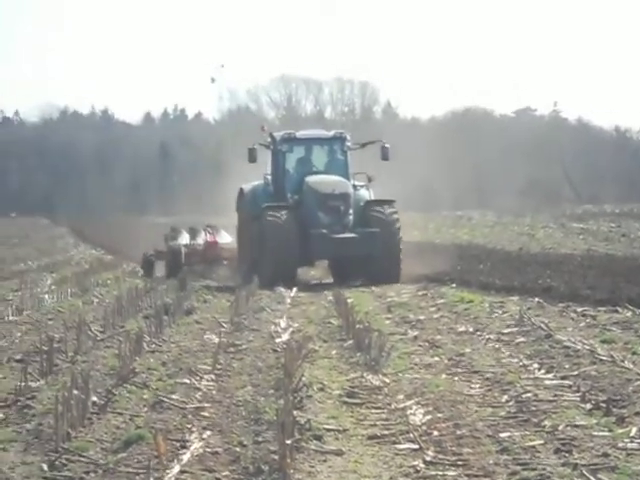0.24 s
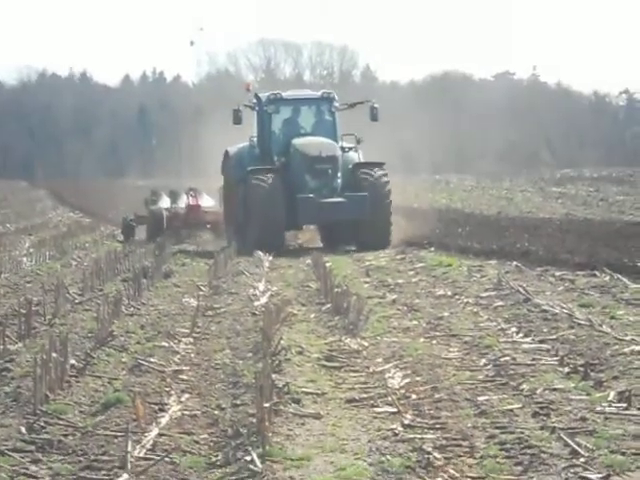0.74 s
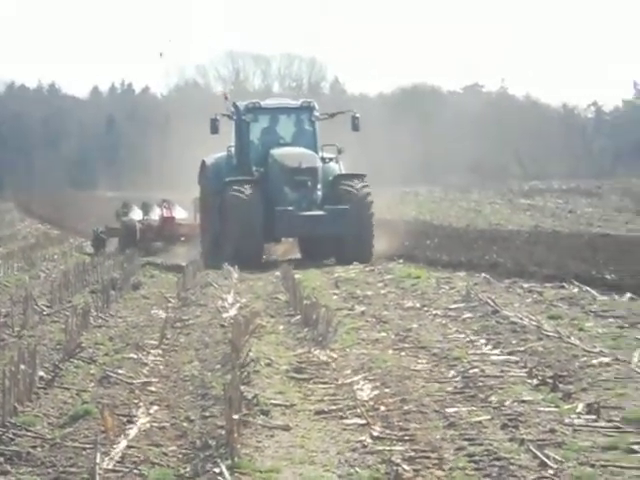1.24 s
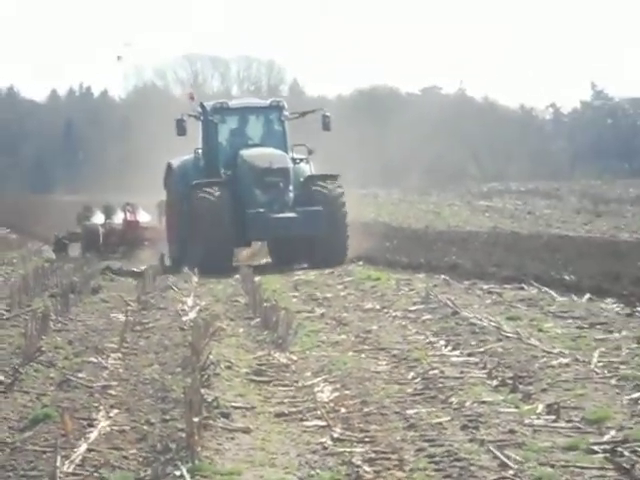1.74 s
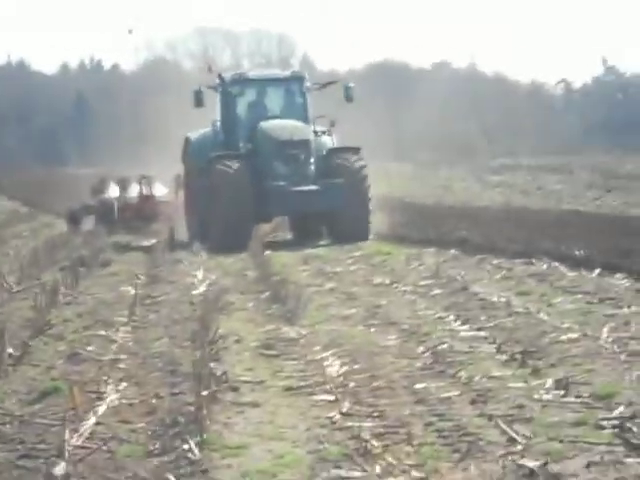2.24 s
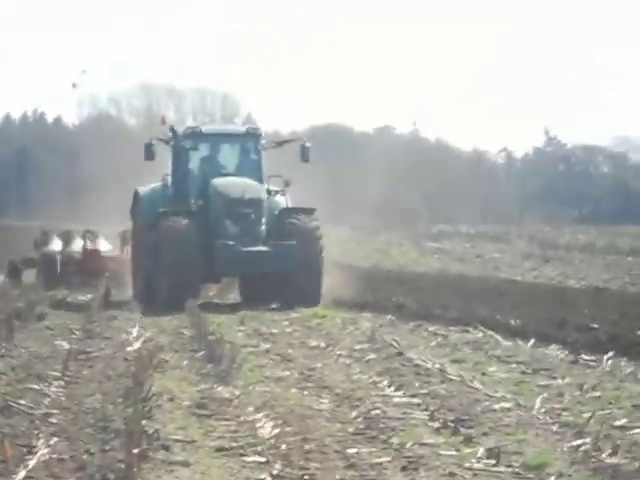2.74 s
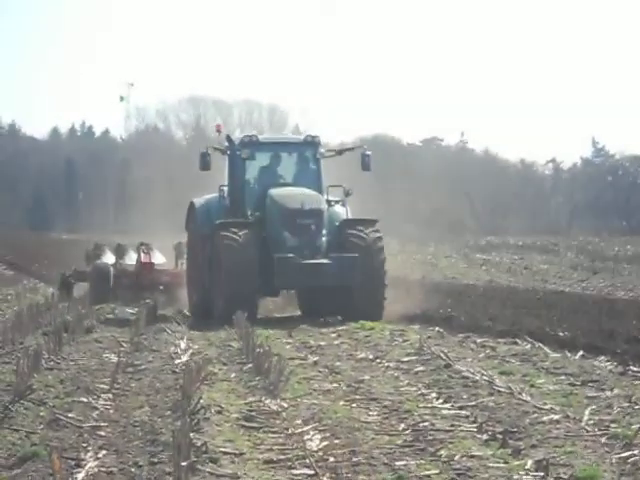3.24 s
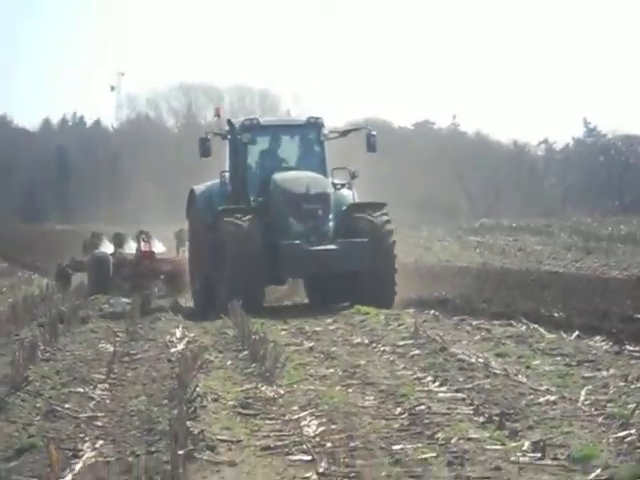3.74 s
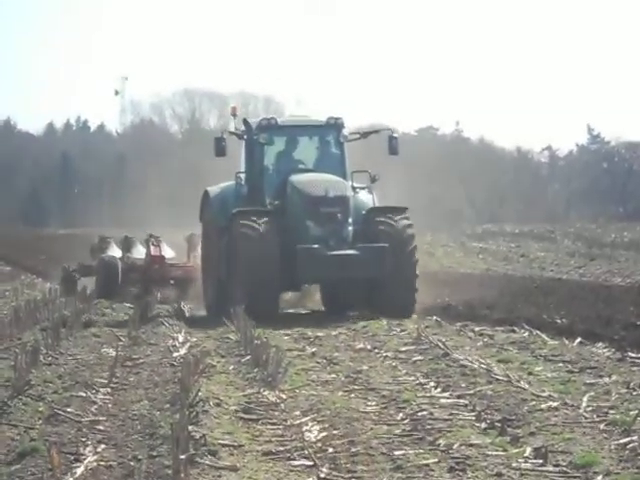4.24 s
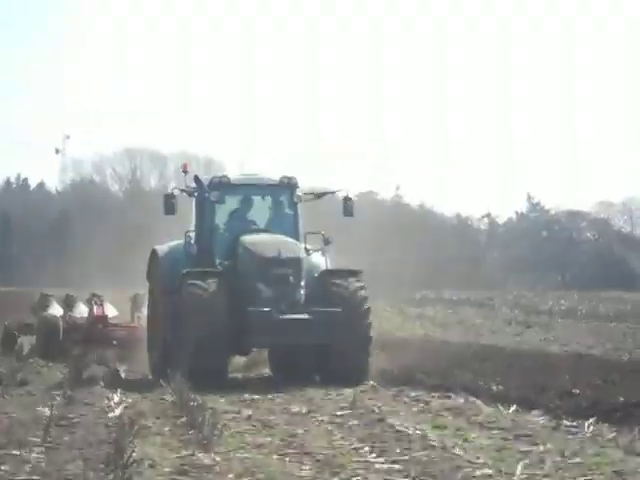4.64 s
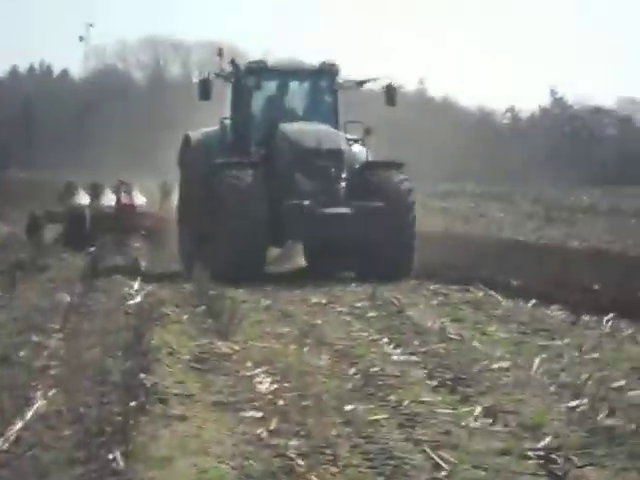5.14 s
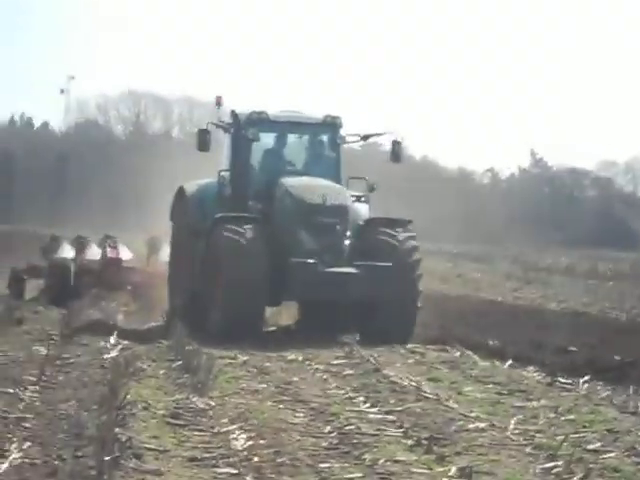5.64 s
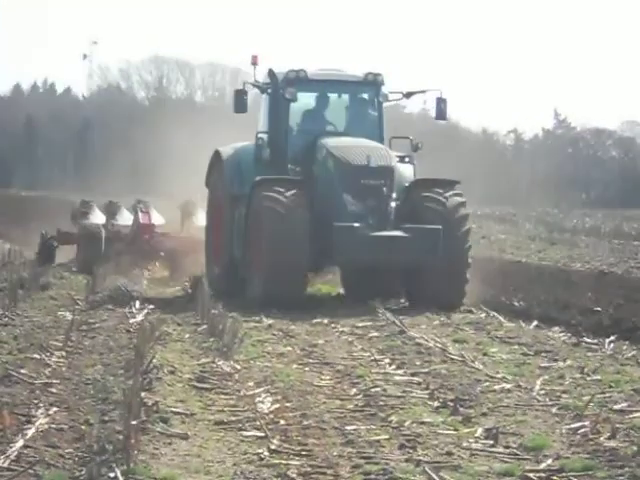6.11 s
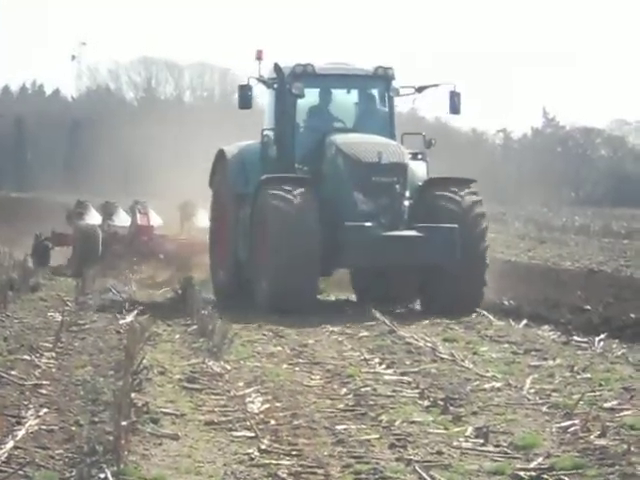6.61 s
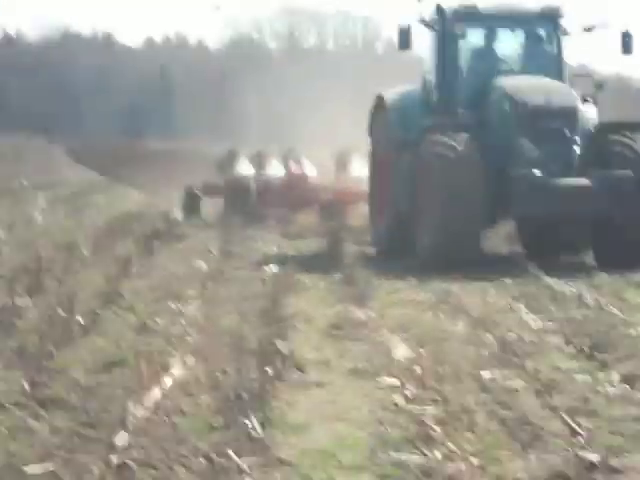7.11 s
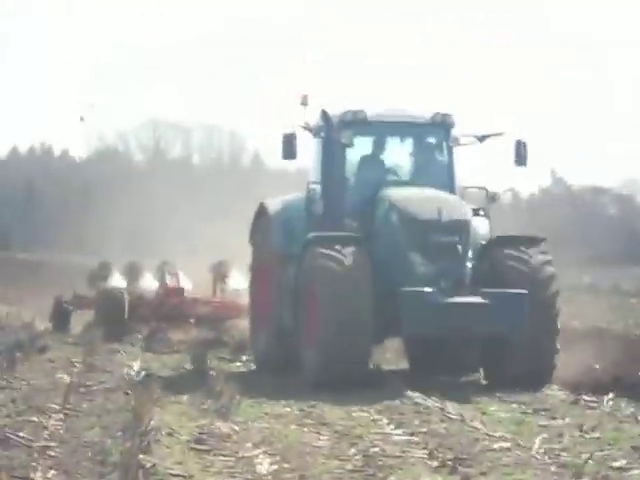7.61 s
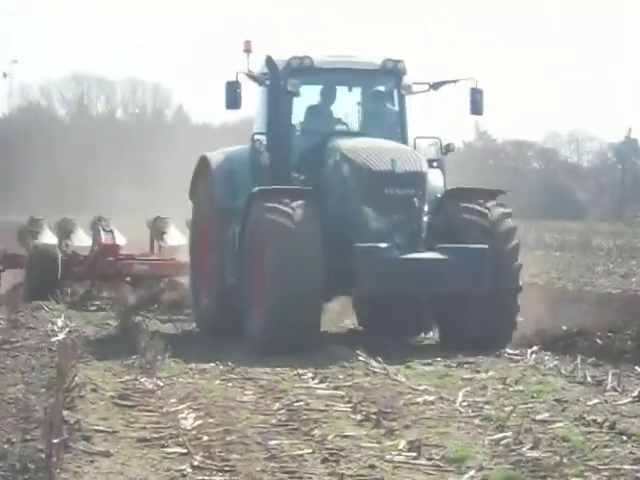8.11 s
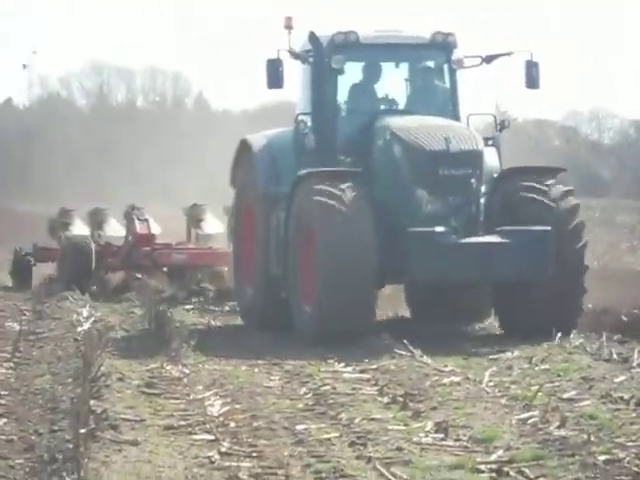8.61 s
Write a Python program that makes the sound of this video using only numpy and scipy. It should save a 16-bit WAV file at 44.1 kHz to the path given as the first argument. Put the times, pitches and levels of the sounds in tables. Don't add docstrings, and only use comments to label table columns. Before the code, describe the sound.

A heavy diesel tractor drones steadily as it ploughs across stubble toward the microphone, with wind gusts thumping and dry stalks snapping up close.

```python
import sys
import numpy as np
from scipy import signal
from scipy.fft import rfft, irfft, next_fast_len
from scipy.io import wavfile
from scipy.ndimage import uniform_filter1d

SR = 44100
rng = np.random.default_rng(int(sys.argv[2]) if len(sys.argv) > 2 else 0)


def boost_factor(decibels):
    exponent = np.asarray(decibels, float) / 20
    return 10 ** exponent


def int16_out(signal):
    q = np.round(np.clip(np.atleast_2d(signal).T, -1, 1) * 32767)
    wavfile.write(sys.argv[1], SR, q.astype(np.int16))


N = 390726

# t/s, firing rate f/Hz
FIRING_HZ = [(0, 82.1), (.35, 82.2), (.52, 81.4), (.85, 81.8), (1.2, 81.1), (1.48, 82.1), (1.7, 81.5),
             (3.25, 81.05), (3.65, 81.75), (3.85, 81.25), (4.25, 82.25), (5.2, 81.95), (5.4, 81.35),
             (5.75, 82.4), (6.05, 81.5), (7.9, 82.3), (8.35, 81.3), (8.86, 81.15)]
# t/s, distance/1 (2 far, 0 close)
DISTANCE = [
    (0, 1.75),
    (1.4, 1.77),
    (2.6, 0.74),
    (3.3, 1.17),
    (4.2, 0.57),
    (5.3, 0.65),
    (6.3, 0.38),
    (7, 0.033),
    (8.86, 0.057),
]
# t/s, level re roar/dB
BOOM_DB = [(0, 12.5), (1.0, 9.5), (1.2, 10.5), (1.7, 12.5), (2.3, 8), (2.6, 11.5), (3.2, 13.5), (3.8, 12.5),
           (4.3, 11.5), (6.0, 12), (6.9, 10.5), (7.7, 9.3), (8.86, 11)]
# order/(1/cycle), level re roar/dB
ORDERS_DB = [(3, -10), (11, -12), (12, -8), (14, -7.5), (15, -8), (18, -13.5), (19, -21), (20, -9),
             (22, -12), (24, -12), (26, -17), (28, -17.5), (30, -21.5), (36, -22.5), (38, -28), (53, -16.5),
             (90, -13.5), (94, -18), (96, -19.5)]
# order/(1/cycle), level re roar/dB
TIMING_DB = [(102, -11), (120, -21)]
# order/(1/cycle), level/dB
PUMPS_DB = [(31.1, -2.5), (33.07, -1.5), (42.4, -8)]
# f/Hz, density re roar/(dB per Hz)
ROAR_SPECTRUM_DB = [(26, -44), (72, -26), (145, -31), (180, -23.5), (339, -29.5), (430, -31), (476, -33.5),
                    (546, -27.5), (737, -28), (899, -34), (1162, -29.0), (1259, -25), (1396, -31), (1499, -33.5),
                    (1550, -39.5), (1722, -41), (1981, -35.5), (2583, -34), (2928, -38.5), (3445, -37),
                (3703, -38.5), (4220, -39.5), (4737, -35.7), (5857, -40.5), (6201, -40), (8871, -47),
                (9733, -48), (9991, -48.5)]
# f/Hz, level/dB
MIDWAY_DB = [(516, -0.9), (1550, 0), (1950, 0), (2550, 0.5), (2950, -1), (3359, -3.5), (4048, 1.5),
             (4478, -2), (4909, -0.5), (5770, -3.5), (6459, -1), (7062, -3), (9991, -2.5)]
# f/Hz, level/dB
FAR_DB = [(516, 1.9), (1464, 2), (1894, 5.5), (2497, -8.5), (2680, -3), (2900, -5), (3150, 4), (3445, -3),
          (3750, 2), (3962, 4.5), (6115, -4), (7751, 1.8), (9646, -4.5), (9991, -3.5)]
# t/s, level/dB, half width/s
GEAR_SLACK = [
    (2.5, -10, 0.34),
    (.15, 2.5, .2),
    (3.35, -7, 0.6),
    (8.86, -10, 0.53),
]
# t/s, roar level/dB, treble level/dB, half width/s
BITES = [
    (1.0, 2.5, -1, 0.064),
    (1.42, -1.5, 3.5, .04),
    (3.0, 1.5, -2.5, .6),
    (6.7, 0.2, 0.8, .2),
    (8.35, -0.6, -1.1, .25),
]
# t/s, f/Hz
TURBO_HZ = [(0, 4015), (.5, 3972), (1.1, 3957), (2.2, 3962), (3.5, 3990), (4.1, 3990), (4.6, 3965),
            (8.86, 3960)]
# t/s, level re roar/dB
TURBO_BEAM_DB = [(0, -20), (.2, -11), (.42, -11), (.5, -17), (.6, -10), (1.05, -12), (1.15, -16),
                 (1.38, -10), (1.5, -20), (2.3, -21), (3.5, -21), (4.0, -17), (4.6, -27), (5.2, -31)]
# t/s, peak level/dB, hold/s
RUMBLES = [(0, -23, .02), (.16, -22, .03), (.28, -20, .02), (.41, -27, .01), (.49, -17, .02),
           (.84, -23.5, 0.048), (1.065, -19, .035), (1.31, -28, .02), (1.44, -29, .01), (1.54, -30, .01),
           (1.76, -21, 0.055), (1.91, -30, .01), (2.08, -36, .03), (2.3, -39, .03), (2.56, -33, .02),
           (2.77, -37, .05), (3.03, -37, .01), (3.31, -31, .01), (3.44, -29, .02), (3.55, -28, .05),
           (3.78, -25, .07), (4.01, -26, .03), (4.13, -24, .02), (4.3, -21.5, .13), (4.58, -27, .06),
           (4.74, -28, .02), (5.01, -28, .05), (5.2, -26, .1), (5.45, -26, .06), (5.67, -26, .02)]
# t/s, peak level/dB, hold/s
FLUTTERS = [(.16, -19, .04), (.28, -21, .03), (.44, -22, .01), (.84, -24, .011), (1.05, -20.5, .03),
            (1.31, -23, .03), (1.43, -21, .01), (1.51, -22, .01), (1.74, -24, 0.1), (1.92, -27, .065),
            (2.03, -29, .04), (2.2, -27, .06), (2.75, -24, 0.0093), (2.9, -25, 0.072),
            (3.07, -22.5, 0.0093), (3.25, -22.5, .11), (3.36, -20.5, .046), (3.48, -20, .03),
            (3.6, -23.5, .05), (3.81, -20, 0.061), (4.0, -21, 0.07), (4.06, -17, .02), (4.16, -19, .01),
            (4.25, -20, .03), (4.36, -21, 0.033), (4.48, -19, 0.011), (4.62, -18, .01), (5.01, -22, 0.057),
            (5.3, -21, 0.092), (5.46, -21, .06), (5.95, -21, 0.044)]
# t/s, rumble level/dB, flutter level/dB
BREEZE_DB = [(0, -38, -28), (2.1, -39, -25.5), (3.2, -41, -25), (3.7, -34, -20), (6.1, -35, -26),
             (6.4, -42, -26.5), (8.86, -43, -27)]
# t/s, peak level/dB, f/Hz
PUSHES = [(0.4328, -8.2, 170), (1.379, -8.9, 220), (1.4083, -12.8, 170), (1.4433, -7.7, 190),
          (1.4494, -14.4, 150), (1.6938, -14.5, 170), (1.7056, -6.6, 220), (1.7163, -6.3, 190),
          (1.7185, -15.5, 440), (1.7221, -14.2, 440), (1.7243, -15.0, 100), (1.7489, -12.4, 140),
          (1.7567, -15.6, 130), (1.7649, -10.8, 220), (1.7714, -13.2, 200), (1.7765, -17.4, 220),
          (1.7841, -11.2, 440), (1.7903, -16.2, 530), (1.8001, -17.8, 100), (1.8028, -15.7, 270),
          (1.8101, -18.1, 250), (1.8161, -16.5, 530), (1.9222, -17.7, 140), (1.9287, -20.5, 170),
          (1.9657, -20.1, 170), (2.0617, -23.2, 150), (2.2246, -22.1, 250), (3.3478, -13.9, 220),
          (3.4057, -14.2, 270), (3.4723, -12.2, 170), (3.4795, -12.9, 220), (3.7894, -10.0, 200),
          (4.308, -8.5, 170), (4.3189, -13.3, 140), (4.365, -11.2, 250), (4.3717, -12.1, 250),
          (4.3815, -4.0, 190), (4.4455, -15.1, 220), (4.4737, -7.0, 270), (4.4782, -13.0, 150),
          (4.5016, -14.7, 170), (4.5112, -11.1, 200), (4.5295, -14.1, 190), (4.6133, -17.4, 140),
          (4.6376, -14.8, 360), (4.6451, -15.2, 300), (5.1478, -14.9, 250), (5.2127, -12.0, 270),
          (5.2893, -13.4, 220), (5.3854, -11.6, 200), (5.3941, -15.3, 250), (5.4369, -13.1, 360),
          (5.4795, -12.9, 200), (5.4941, -11.2, 150),
          (1.7185, -21, 600), (1.756, -21, 750), (1.8035, -17, 950), (2.088, -22, 420), (1.27, -19, 450),
          (4.062, -15, 270), (4.4935, -13, 130), (4.251, -13, 110), (5.343, -19, 700), (1.9, -25, 600),
          (4.4765, -21, 750), (4.506, -15, 400), (4.4925, -21, 700), (2.005, -22, 130), (2.027, -23, 200),
          (2.077, -22, 120), (1.898, -21, 130), (1.429, -15, 120), (1.343, -17, 150), (1.819, -16, 120),
          (5.315, -15, 130), (3.947, -16, 280), (3.995, -16, 280)]
# t/s, peak level/dB, f/Hz
PULLS = [(0.2748, -12.6, 190), (0.845, -12.7, 200), (1.062, -12.5, 250), (1.4331, -12.8, 190),
         (1.4438, -13.0, 360), (1.6602, -15.7, 200), (1.7239, -6.1, 300), (1.7725, -14.6, 580),
         (1.7774, -9.6, 110), (1.7839, -5.4, 170), (1.7858, -6.6, 780), (1.7868, -15.2, 710),
         (1.7887, -11.6, 400), (1.7943, -12.1, 1140), (1.7954, -12.6, 200), (1.8072, -11.7, 330),
         (1.8179, -12.5, 270), (1.824, -17.0, 110), (1.9369, -16.0, 200), (2.127, -16.6, 270),
         (2.2001, -21.5, 190), (3.4239, -14.5, 220), (3.5091, -12.2, 360), (4.0582, -10.6, 200),
         (4.2322, -13.0, 220), (4.2848, -12.5, 140), (4.3276, -11.2, 190), (4.3445, -10.1, 200),
         (4.3552, -9.9, 220), (4.3608, -4.6, 140), (4.3839, -12.3, 330), (4.3946, -11.9, 150),
         (4.4907, -13.3, 200), (4.5244, -11.1, 220), (4.5426, -14.4, 150), (4.5792, -13.3, 220),
         (4.6024, -13.9, 200), (4.6153, -12.3, 330), (5.3444, -9.2, 220), (5.4271, -14.5, 170),
         (5.4846, -15.2, 200),
         (4.525, -11, 100), (4.586, -16, 100), (4.61, -16, 100), (4.451, -16, 100), (1.807, -14, 100),
          (1.3, -17, 130), (1.275, -17, 130)]
# t/s, gain/dB, hold/s
DUCKS = [(1.09, -1, 0.36), (1.433, -6, 0.35), (1.775, -17.5, 0.5), (4.31, -2.5, .05), (4.375, -6, 0.26),
         (4.507, -7.5, 0.59), (5.28, -6, 0.18), (5.68, -4.2, .15), (5.957, -2.5, 0.13)]
# t/s, peak level/dB, centre f/Hz, bandwidth/octaves
SNAPS = [(1.41, -24, 3370, 0.11), (1.404, -29, 3100, 0.092), (1.408, -25, 6300, .12),
         (1.7315, -20, 3300, 2.1), (1.9133, -23, 4500, 2.5), (1.9134, -19, 1300, .8),
         (1.9143, -22, 1200, .4), (1.9142, -13, 3800, 4), (1.9143, -22, 9800, .5), (1.9237, -28, 9000, .7),
         (1.9325, -24, 5700, .2), (1.9326, -27, 8300, .12), (1.9329, -24, 3050, 0.3), (2.9, -23, 3640, 1.5),
         (4.4867, -16.5, 3240, 0.3), (4.4866, -19, 1780, 0.3), (4.4868, -15, 5950, .26),
         (4.487, -26, 8600, .3), (5.64, -18, 4200, .7), (7.0266, -16, 9500, .6), (7.0558, -10, 8600, 0.48),
         (7.0558, -11, 11800, .2), (7.056, -10, 5000, 0.5), (7.0566, -10, 3400, 0.4),
         (7.058, -15, 1700, 1.1), (7.256, -11, 5200, .6), (7.2564, -9, 3000, .8), (7.2577, -12, 2500, 1.2),
         (7.6636, -14, 8700, .81), (7.8857, -20, 3300, 1.7), (8.0927, -11, 9700, .6),
         (8.0945, -16, 9300, .6), (8.0961, -14, 11000, .5), (8.0987, -10, 12000, .3),
         (8.0989, -6, 9300, 0.35), (8.1005, -11, 8000, 1.1), (8.1215, -18, 9500, 0.96),
         (8.528, -22, 7500, .6), (8.5388, -16, 7500, .7), (8.5413, -19, 7600, .5), (8.5458, -21, 8300, .5),
         (8.5508, -19, 6900, .4), (8.568, -17, 8500, 1.2), (8.5805, -22, 5000, .7),
         (8.6221, -25, 5000, .15), (8.627, -26, 5000, .15), (8.632, -24, 5130, .15),
         (8.6533, -14, 7000, 1.7), (8.6625, -16, 6500, 1.7)]
# f/Hz, level/dB
MICROPHONE_DB = [(9800, 0.5), (10300, -0.5), (10700, -11), (11100, -19.5), (11600, -17), (12000, -23),
                 (12230, -33), (12400, -45)]

CYLINDERS = 6
GEAR_ORDER, GEAR_DB = 68.6, -9.5
PUMP_DB, PUMP_DB_PER_S = -7, -0.31
ROAR_DB, ROAR_RISE_DB_PER_S, ROAR_LEVELS_OFF_S = -30.5, .5, 6.56
DUCK_ATTACK_S, CREEP_PER_S, CREEP_BEND = 0.018, 0.45, 0.82
GUST_RISE_DB_PER_S, GUST_FALL_DB_PER_S = 170, 198
EDDY_CYCLES, EDDY_TRIM_DB = .55, -1.5
OVERLOAD_S, OVERLOAD_DB, OVERLOAD_WIDTH_S = 1.7811, 3.5, .0015
SNAP_T60_S, SNAP_NARROW = 0.0058, 0.33
CRACKLE_PER_S, CRACKLE_DB, CRACKLE_FROM_S = 30, -29.5, 6.2
CEILING = .708


def columns(rows):
    s, *rest = np.transpose(rows)
    return [np.interp(np.arange(N) / SR, s, c) for c in rest]


def at_hz(points, hz):
    table_hz, table_db = np.array(points).T
    return np.interp(np.log(hz), np.log(table_hz), table_db)


def rms_one(x):
    return x / np.sqrt(np.mean(x ** 2) + 1e-20)


def band(x, low_hz, high_hz):
    sos = signal.butter(2, [low_hz, min(high_hz, .45 * SR)], "band", fs=SR, output="sos")
    return signal.sosfilt(sos, x)


def coloured(x, db_at):
    size = next_fast_len(N)
    gain = boost_factor(db_at(np.maximum(np.fft.rfftfreq(size, 1 / SR), 1)))
    return irfft(rfft(x, size) * gain, size)[..., :N]


def bump(s, width_s):
    return np.exp(-((np.arange(N) / SR - s) / width_s) ** 2)


def drift(rate_hz):
    hop, settle = 40, 2000
    r = np.exp(-2 * np.pi * rate_hz * hop / SR)
    coarse = rng.standard_normal(N // hop + settle + 2)
    slow = signal.lfilter([1], [1, -2 * r, r * r], coarse)[settle:]
    return np.interp(np.arange(N) / hop, np.arange(len(slow)), rms_one(slow))


def tractor():
    t = np.arange(N) / SR
    (firing_hz,), (boom_db,), (distance,) = columns(FIRING_HZ), columns(BOOM_DB), columns(DISTANCE)
    treble_db = sum(db * bump(s, width) for s, _, db, width in BITES) + 0.3 - 0.17 * t
    gear_db = GEAR_DB + sum(db * bump(s, width) for s, db, width in GEAR_SLACK)
    cycles = np.cumsum(firing_hz + .2 * drift(3.5)) / CYLINDERS / SR

    boom = boost_factor(boom_db) * tones(cycles, [(CYLINDERS, -.4)], waver_db=0.53)
    crank = tones(cycles, ORDERS_DB, waver_db=1.8)
    timing = boost_factor(-2.5 * distance) * tones(cycles, TIMING_DB, waver_db=1.5)
    pumps = boost_factor(PUMP_DB + PUMP_DB_PER_S * t) * tones(cycles, PUMPS_DB, waver_db=1.2)
    gear = boost_factor(gear_db) * tones(cycles, [(GEAR_ORDER, 0)], waver_db=0.5)
    noise = roar(cycles, np.clip(distance, 0, 2), treble_db, locked=0.47, knock_db=.3, patchy_db=0.6)
    turbo_hz, turbo_db = columns(TURBO_HZ)[0], columns(TURBO_BEAM_DB)[0]
    return boom + crank + timing + pumps + gear + noise + whistles(turbo_hz, turbo_db, distance)


def tones(cycles, table, waver_db):
    out = 0
    for order, db in table:
        level = np.sqrt(2) * boost_factor(db + waver_db * drift(5.4))
        out = out + level * np.sin(2 * np.pi * (order * cycles + rng.random()))
    return out


def roar(cycles, distance, treble_db, locked, knock_db, patchy_db):
    drive = rng.standard_normal((2, N)) + locked * clatter(cycles, turn_share=0.55)
    drive = drive * np.sqrt(SR / 2 / (1 + locked ** 2))
    near = coloured(drive, lambda hz: at_hz(ROAR_SPECTRUM_DB, hz))
    midway = coloured(near, lambda hz: at_hz(MIDWAY_DB, hz))
    far = coloured(near, lambda hz: at_hz(FAR_DB, hz))
    heard = near * np.clip(1 - distance, 0, 1)
    heard = heard + midway * (1 - abs(distance - 1))
    heard = heard + far * np.clip(distance - 1, 0, 1)

    knock = knock_db * np.cos(2 * np.pi * CYLINDERS * cycles)
    edges_hz = 20 * 2 ** np.arange(0, 9.7, 1 / 3)
    together, out = drift(3.0), 0
    for k, (low, high) in enumerate(zip(edges_hz, edges_hz[1:])):
        db = patchy_db * (1.1 * together + drift(26.0))
        db = db + knock * (low > 1500) + treble_db * (low > 3000)
        out = out + boost_factor(db) * band(heard[k % 2], low, high)
    return out


def clatter(cycles, turn_share):
    turn, cycle = rng.standard_normal(1624), rng.standard_normal(3248)
    pattern = turn_share * np.tile(turn, 2) + (1 - turn_share) * cycle
    return rms_one(pattern[(cycles % 1 * len(pattern)).astype(int)])


def whistles(turbo_hz, turbo_db, distance):
    turbo = np.sqrt(2) * np.sin(2 * np.pi * np.cumsum(turbo_hz + 2.53 * drift(19.0)) / SR)
    intake = rms_one(band(rng.standard_normal(N), 2590, 2710))
    turbo_db = turbo_db + 1.7 * drift(7.6)
    intake_db = -14.5 + 4.0 * bump(2.7, .12) - 5.1 * np.clip(distance - 1, 0, 1) + 1.3 * drift(2.3)
    return boost_factor(turbo_db) * turbo + boost_factor(intake_db) * intake


def automatic_gain():
    t, gain = np.arange(N) / SR, np.ones(N)
    for s, db, hold in DUCKS:
        creep = boost_factor(db) + CREEP_PER_S * np.maximum(t - s - hold, 0) ** CREEP_BEND
        gain = np.minimum(gain, np.where(t < s, 1, creep))
    r = np.exp(-1 / (DUCK_ATTACK_S * SR))
    return signal.lfilter([1 - r], [1, -r], 20 * np.log10(gain))


def wind(gain_db):
    calm_rumble_db, calm_flutter_db = columns(BREEZE_DB)
    white = rng.standard_normal((2, N))
    rumble = band(white[0], 12.0, 69)
    rumble = rumble / np.sqrt(uniform_filter1d(rumble ** 2, size=SR // 8))
    flutter = rms_one(boost_factor(3.2 * drift(47.0)) * band(white[1], 84.0, 269))
    rumble_db = gusts(RUMBLES, calm_rumble_db + 0.52 * gain_db + 2.5 * drift(3.5))
    flutter_db = gusts(FLUTTERS, calm_flutter_db + 0.67 * gain_db) - 5.5
    overload = bump(OVERLOAD_S, OVERLOAD_WIDTH_S) - 0.1 * bump(OVERLOAD_S, 4 * OVERLOAD_WIDTH_S)
    return boost_factor(rumble_db) * rumble + boost_factor(flutter_db) * flutter + eddies() + boost_factor(OVERLOAD_DB) * overload


def gusts(rows, breeze_db):
    t, out = np.arange(N) / SR, breeze_db
    for s, db, hold in rows:
        rise_db = GUST_RISE_DB_PER_S * np.maximum(s - hold / 2 - t, 0)
        fall_db = GUST_FALL_DB_PER_S * np.maximum(t - s - hold / 2, 0)
        out = np.maximum(out, db - rise_db - fall_db)
    return out


def eddies():
    t, out = np.arange(-1000, 1000) / SR, np.zeros(N)
    for sign, rows in ((1, PUSHES), (-1, PULLS)):
        for s, db, hz in rows:
            at = round(s * SR) - len(t) // 2
            swell = np.exp(-(hz * t / EDDY_CYCLES) ** 2)
            out[at:at + len(t)] += sign * boost_factor(db + EDDY_TRIM_DB) * swell * np.cos(2 * np.pi * hz * t)
    return out


def stalks():
    t = np.arange(SR // 40) / SR
    out, bursts = np.zeros(N), rng.standard_normal((len(SNAPS), len(t)))
    bursts[:, 0] = 13.0
    for (s, db, hz, octaves), burst in zip(SNAPS, bursts):
        t60_s = SNAP_T60_S / octaves ** SNAP_NARROW
        half = 2 ** (octaves / 2)
        snap = band(burst * boost_factor(-60 * t / t60_s), hz / half, hz * half)
        at = round(s * SR)
        out[at:at + len(t)] += boost_factor(db) * snap / np.abs(snap).max()
    return out


def crackle():
    sizes = boost_factor(CRACKLE_DB + 4.0 * np.minimum(rng.exponential(1, N), 3)) * rng.choice([-1, 1], N)
    near = np.clip((np.arange(N) / SR - CRACKLE_FROM_S) / 1.5, 0, 1)
    ticks = sizes * near * (rng.random(N) < CRACKLE_PER_S / SR)
    grain = rng.standard_normal(88) * boost_factor(np.linspace(0, -30, 88))
    return band(np.convolve(ticks, grain)[:N] + 1e-18, 6500, 12000)


def scene():
    gain_db = automatic_gain()
    roar_db = ROAR_DB + ROAR_RISE_DB_PER_S * np.minimum(np.arange(N) / SR, ROAR_LEVELS_OFF_S)
    roar_db = roar_db + sum(db * bump(s, width) for s, db, _, width in BITES)
    return (boost_factor(roar_db + gain_db) * tractor() + wind(gain_db) + stalks() + crackle())[None]


def band_limit(x):
    return signal.sosfilt(signal.butter(12, 12220, fs=SR, output="sos"), x)


def record(dry):
    mix = np.clip(coloured(dry, lambda hz: at_hz(MICROPHONE_DB, hz)), -CEILING, CEILING)
    return band_limit(mix)


dry = scene()
out = record(dry)
int16_out(out)
```